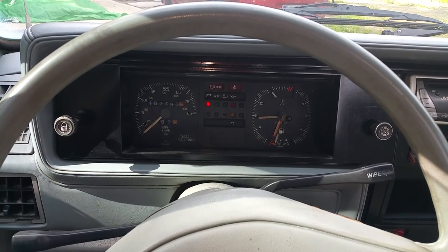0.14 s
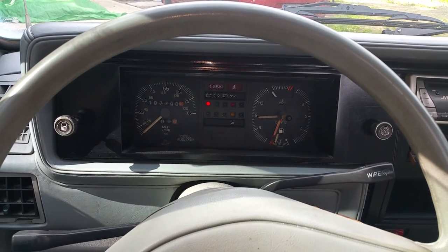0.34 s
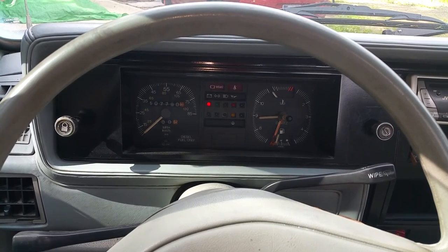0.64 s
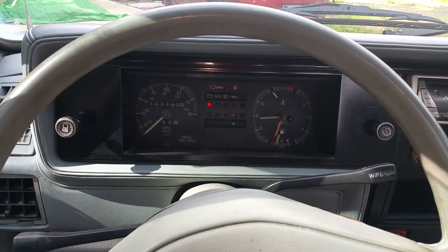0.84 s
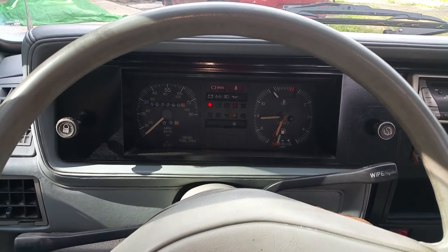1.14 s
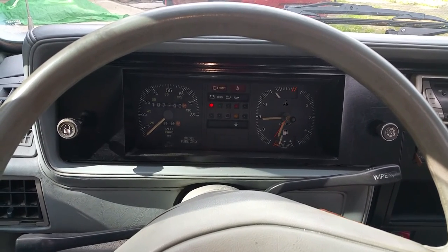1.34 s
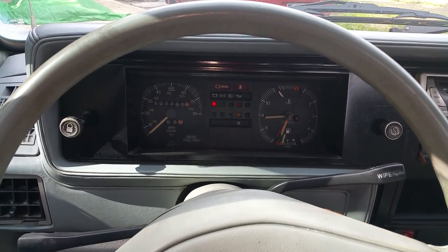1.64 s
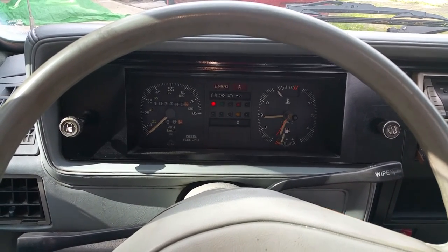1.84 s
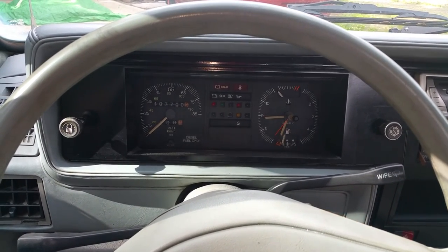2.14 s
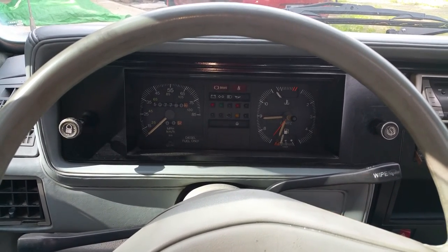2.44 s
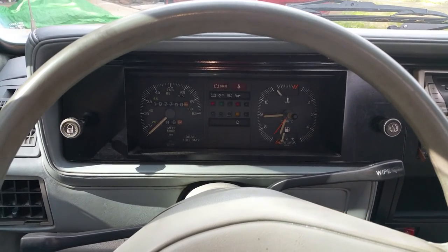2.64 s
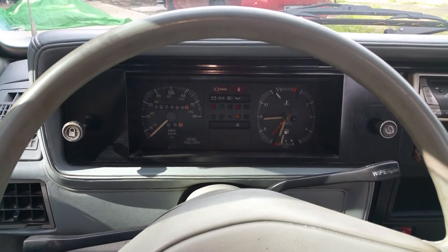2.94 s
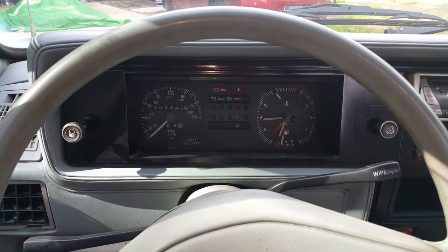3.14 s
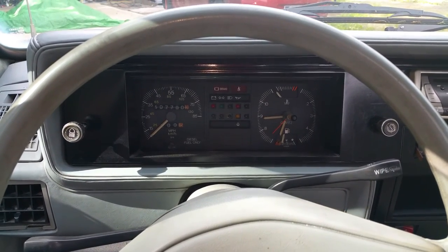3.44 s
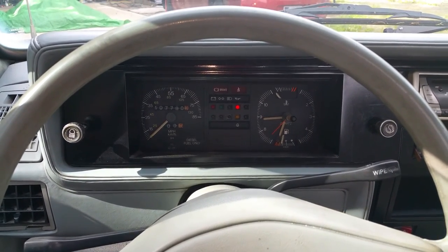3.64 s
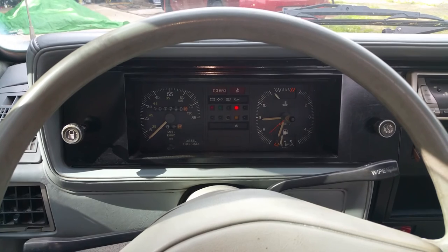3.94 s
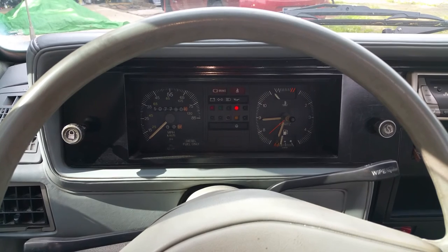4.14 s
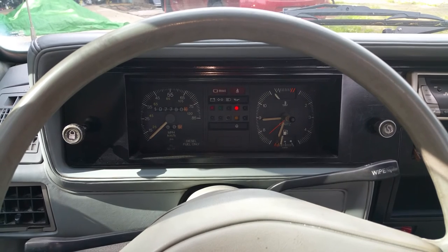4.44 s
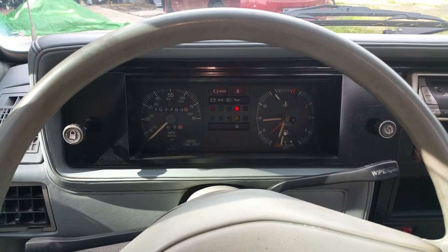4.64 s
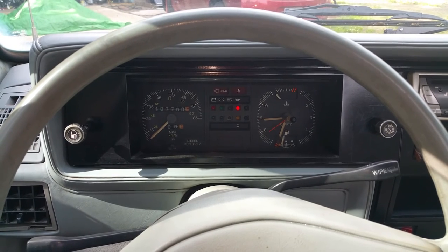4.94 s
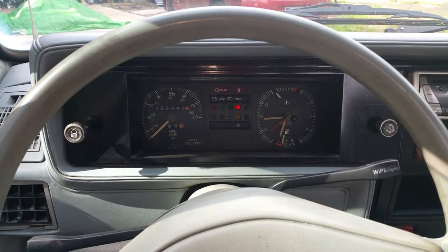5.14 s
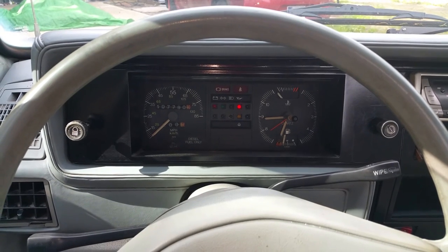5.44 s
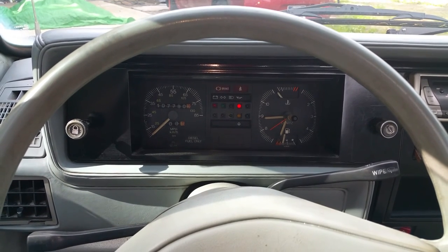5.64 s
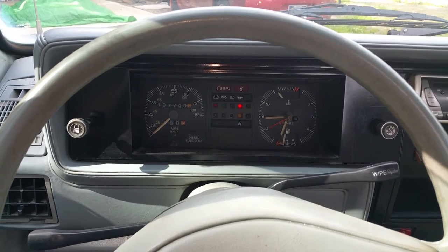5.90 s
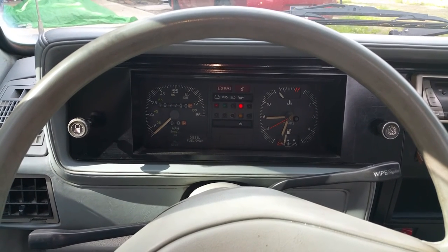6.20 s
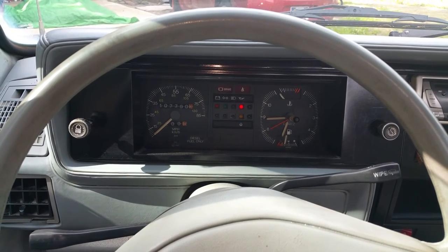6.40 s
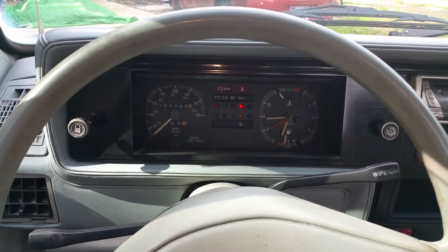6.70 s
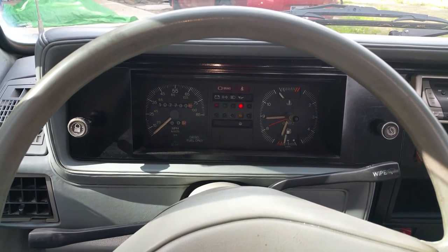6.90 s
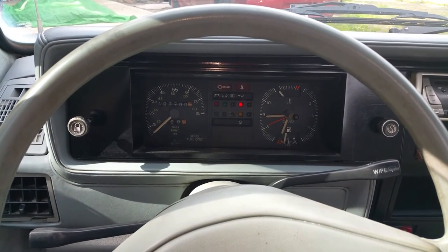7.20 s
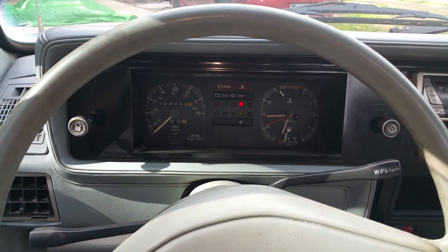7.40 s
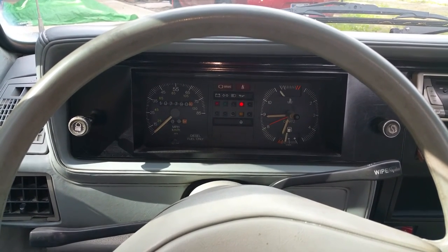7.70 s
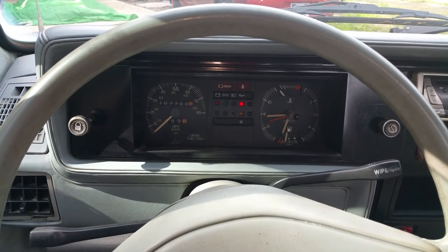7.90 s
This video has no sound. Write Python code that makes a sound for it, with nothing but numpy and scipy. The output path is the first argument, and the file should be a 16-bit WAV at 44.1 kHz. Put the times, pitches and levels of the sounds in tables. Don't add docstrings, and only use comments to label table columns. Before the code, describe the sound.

A quiet parked car interior, heard in stereo at the driver's seat: soft distant rumble, faint hiss, and dash clock ticks near 0.0 and 1.0 s. A small key click at 0.6 s; from 1.25 to 1.4 s, lock clicks, a jingle and dull column clunks. The starter bites at 1.4 s with a brief rough grind and climbing whine. From 1.7 to 2.1 s loud, uneven low thumps and knocks crowd together, with bright key clicks. The diesel runs from 2.1 s, booming and clattering as revs flare to a peak around 2.95 s, a turbine whistle rising behind. At 3.55 s the pedal is released: the boom drops suddenly, and revs and whistle fall. A fast idle holds from about 4.4 to 5.7 s, then sags by 7 s to a slower, looser clattering idle, lifting slightly until 8 s. Occasional fine key tinkles continue until 6.5 s.

```python
import sys
import numpy as np
from scipy import signal
from scipy.fft import rfft, irfft, next_fast_len
from scipy.io import wavfile
from scipy.ndimage import uniform_filter1d

SR = 44100
rng = np.random.default_rng(int(sys.argv[2]) if len(sys.argv) > 2 else 0)


def wav_out(sig):
    wavfile.write(sys.argv[1], SR, np.round(np.clip(np.atleast_2d(sig).T, -1, 1) * 32767).astype(np.int16))


def invert_db(level):
    return 10 ** (np.asarray(level, dtype=float) / 20)


N = 355446

T = np.arange(N) / SR
SHORT_T = np.arange(SR // 4) / SR
BINS_HZ = np.maximum(np.arange(N // 2 + 1) * SR / N, 1)

# t/s, rate f/Hz
CRANKING = [
    (1.4, 11.75),
    (1.68, 14.6),
    (1.72, 36),
    (2.05, 39.9),
]
# t/s, firing rate f/Hz
REVS = [(2.1, 48.9), (2.17, 54.7), (2.25, 62.1), (2.38, 67.77), (2.52, 71.6), (2.66, 73.36), (2.95, 75.1),
        (3.15, 74), (3.38, 71.1), (3.59, 67.5), (4.1, 61.3), (4.45, 59.57), (5.7, 59.08), (6.2, 56.7),
        (7.0, 51.6), (7.25, 51.52), (7.7, 53.2), (8.06, 53.5)]
# t/s, peak level/dB, ring f/Hz, knock level/dB
THUMPS = [(1.447, -25.5, 62.4, -60), (1.499, -34, 74.3, -52), (1.594, -29, 92, -41.5),
          (1.674, -34, 114, -41), (1.713, -16.5, 63, -28.5), (1.741, -11, 86, -24), (1.779, -22, 50.5, -43),
          (1.794, -3, 94, -21), (1.819, -9.5, 70.4, -45), (1.844, -6, 97.4, -19.5), (1.87, -9.5, 64.6, -21),
          (1.899, -6, 90, -24), (1.927, -4, 51, -22), (1.953, -12, 81, -24), (1.984, -5, 78.7, -26.5),
          (2.02, -10, 87.6, -33.5), (2.046, -7.5, 63.5, -28.5), (2.071, -3, 75, -34),
          (2.099, -13.5, 191.5, -28.5), (2.119, -16, 165.4, -31)]
CATCH_S = 1.632
RUNNING_S = REVS[0][0]
FUEL_CUT_S = 3.553
MID_REVS_HZ = 60
TAPPET_HZ = 960


def over_hz(points, size=N):
    hz, value = np.transpose(points)
    lines_hz = np.maximum(np.arange(size // 2 + 1) * SR / size, 1)
    return np.interp(np.log(lines_hz), np.log(hz), value)


def colour(x, points):
    above = np.maximum(np.log2(BINS_HZ / points[-1][0]), 0)
    below = np.maximum(np.log2(points[0][0] / BINS_HZ), 0)
    y = irfft(rfft(x) * invert_db(over_hz(points) - 60 * (above + below)), N)
    return y / np.sqrt(np.mean(y ** 2))


def walk(rate):
    k = int(SR / rate)
    held = np.repeat(rng.standard_normal(N // k + 1), k)
    return 1.3 * uniform_filter1d(uniform_filter1d(held, k), k)[:N]


def ramp(s, length):
    return np.clip((T - s) / length, 0, 1)


def add(out, s, sound):
    i = int(s * SR)
    out[..., i:i + sound.shape[-1]] += sound[..., :N - i]


def burst(hz, spread, t60, channels=1, rise_s=0.00087):
    band_hz = np.clip([hz / spread, hz * spread], 30, .45 * SR)
    sos = signal.butter(3, band_hz, "band", fs=SR, output="sos")
    y = signal.sosfilt(sos, rng.standard_normal((channels, len(SHORT_T))))
    return y / np.std(y) / 2 * (1 - np.exp(-SHORT_T / rise_s)) * 1000. ** (-SHORT_T / t60)


def lift(hz, modes):
    return sum(db / (1 + ((hz - f) / width * 2) ** 2) for f, width, db in modes)


def rings(x, modes, lift_db):
    gain = 1 + sum(invert_db(lift_db) * invert_db(db / 4) / (1 + ((BINS_HZ - hz) / (0.6 * width)) ** 2)
                   for hz, width, db in modes)
    y = irfft(rfft(x) * gain, N)
    return y * np.std(x) / np.std(y)


def still():
    # f/Hz, level/dB per Hz
    still_spectrum = [(34, -26), (58, -1.5), (135, -6.5), (179, -9.5), (232, -12.5), (294, -13.5),
                      (408, -19.5), (609, -19.5), (1120, -22.5), (2380, -27), (4820, -32), (14900, -34.5),
                      (16000, -36.5)]
    # f/Hz, rms level/dB
    far_motor = [(66.5, -74), (97, -78), (134.5, -73)]
    motor = 0
    for hz, db in far_motor:
        level = invert_db(db + 1.5 * walk(5.4))
        turns = np.cumsum(hz * (1 + 0.029 * walk(13.0))) / SR
        motor = motor + np.sqrt(2) * level * np.sin(2 * np.pi * turns)
    return invert_db(-70 + 1.2 * walk(8.5)) * colour(rng.standard_normal(N), still_spectrum) + motor


def clock():
    # t/s, peak level/dB, centre f/Hz
    ticks = [
        (0.029, -54.5, 960),
        (1.035, -51.5, 700),
    ]
    out = np.zeros((2, N))
    for s, db, hz in ticks:
        add(out, s, invert_db(db + 2) * burst(hz, 3.5, 0.077, channels=2, rise_s=0.0027))
        for case_hz, case_db in ((950, -4), (2500, -8), (4250, -8)):
            add(out, s + .005, invert_db(db + case_db) * burst(case_hz, 1.1, .08, channels=2, rise_s=.004))
        add(out, s + 0.014, invert_db(db - 6) * burst(hz, 2.9, 0.093, channels=2))
    return out


def keys():
    # t/s, peak level/dB, centre f/Hz, top-end level/dB
    key_clicks = [(.566, -68, 5500, -92), (1.239, -68, 6000, -81.5), (1.276, -54, 2300, -80),
                  (1.3174, -38, 3620, -56), (1.344, -32, 5000, -51), (1.37, -44, 2720, -56.5),
                  (1.4, -49, 4530, -64), (1.4117, -45, 2900, -63.5), (1.5525, -55, 4000, -63),
                  (1.676, -49.5, 2780, -68.5), (1.8734, -22, 2950, -37), (1.9365, -34, 2680, -52),
                  (1.961, -33.5, 2850, -44.5), (1.982, -33.5, 2730, -51), (2.062, -42.5, 5000, -49.5),
                  (2.069, -38.5, 2550, -49.5), (2.094, -36, 4000, -58.5), (2.1076, -32, 4430, -45.5),
                  (2.15, -56, 4500, -67), (2.19, -50.5, 4500, -65), (2.235, -50.5, 4970, -63.5),
                  (2.267, -54, 3510, -64.5)]
    # t/s, f/Hz, level/dB, t60/s
    jingles = [(1.345, 1750, -43, .04), (1.414, 1750, -41, .05), (1.319, 3800, -48, .04),
               (1.277, 3200, -60, .05), (1.37, 6200, -56, .087), (1.318, 4540, -47, .04),
               (1.872, 11600, -44, .04), (1.94, 14200, -58, .04), (1.958, 7030, -57, .2),
               (1.958, 7080, -45, .04), (1.742, 6250, -66, .12), (1.79, 6500, -63, .03),
               (1.958, 10900, -49, .09), (1.962, 8600, -60, .11), (1.962, 10100, -57, .25),
               (1.955, 12700, -57, .3), (1.99, 11800, -64, .15), (2.108, 14300, -52, .04),
               (1.875, 6300, -45, .04), (1.962, 13950, -56, .22), (2.069, 10600, -49.5, .05)]
    # t/s, peak level/dB
    tinkles = [(2.8817, -67), (3.5737, -69), (3.6904, -71), (3.753, -68.5), (4.1992, -75.5), (4.6684, -58),
               (4.8712, -74), (5.0078, -79), (5.211, -67), (5.2784, -73), (5.346, -69), (5.5509, -65.5),
               (6.098, -61), (6.2382, -56), (6.3106, -66), (6.525, -63)]
    out = np.zeros((2, N))
    t60 = 0.08
    for s, db, hz, top_db in key_clicks:
        body = invert_db(db + 1.5) * burst(hz, 1.88, t60, channels=2)
        top = invert_db(top_db + 6.5) * burst(11800, 1.36, 0.8 * t60, channels=2)
        add(out, s, invert_db([[0.75], [-0.75]]) * (body + top))
    for s, hz, db, ring_t60 in jingles:
        decay = np.minimum(SHORT_T / 0.0019, 1) * 1000. ** (-SHORT_T / ring_t60)
        add(out, s, invert_db(db + np.array([[3.5], [-3.5]])) * np.sin(2 * np.pi * hz * SHORT_T) * decay)
    for s, db in tinkles:
        add(out, s, invert_db(db + 4) * burst(14300, 1.08, .025, channels=2))
    return out


def clunks():
    # t/s, peak level/dB, centre f/Hz, t60/s
    lock_clunks = [(1.25, -53, 60, 0.27), (1.416, -43, 1700, .06), (1.222, -64.5, 336, 0.1),
                   (1.256, -51, 170, 0.2), (1.275, -45.5, 1150, 0.11), (1.307, -46, 1070, 0.2),
                   (1.319, -31, 367, 0.13), (1.344, -30, 1280, 0.15), (1.365, -39, 200, 0.2),
                   (1.382, -37, 203, 0.21), (1.402, -29.5, 227, 0.072), (1.414, -26, 290, 0.12),
                   (1.413, -32.5, 1500, 0.077), (1.443, -23, 310, 0.11)]
    # t/s, peak level/dB, centre f/Hz, t60/s
    lone_knocks = [(1.256, -46, 1110, 0.07), (1.499, -34, 676, 0.051), (1.551, -56, 651, 0.068),
                   (1.586, -43, 773, 0.081), (1.676, -41, 600, 0.08), (2.051, -29, 592, 0.076),
                   (3.568, -31, 634, 0.08), (4.997, -35, 757, 0.093), (7.843, -41, 718.2, 0.11)]
    out = np.zeros(N)
    for s, db, hz, t60 in lock_clunks + lone_knocks:
        add(out, s, invert_db(db + 1.5) * burst(hz, 1.65, t60)[0])
    return out


def flares():
    out = np.zeros(N)
    shake = np.minimum(SHORT_T / 0.007, 1) * 1000. ** (-SHORT_T / 0.12)
    pinion = (1.41, -26)  # t/s, level/dB
    for s, db in [pinion] + [(row[0], row[3]) for row in THUMPS]:
        add(out, s - .007, invert_db(db) * shake)
    return out


def clatter_gains(hz):
    clatter_levels = [
        (-45, -30, -34, 0.47, 4, -13.5),
        (-51, -35.5, -35.5, 0.16, 0.8, -18),
        (-61.5, -44, -42, 0.2873, -3, -11),
    ]
    pulling = 1 - ramp(FUEL_CUT_S, 0.087)
    filled, running = ramp(CATCH_S, 0.43), ramp(RUNNING_S, 0.11)
    shake = flares()
    gains = []
    for crank, catch, run, slope, pull, knock in clatter_levels:
        starting_db = crank + filled * (catch - crank)
        running_db = run + slope * (hz - MID_REVS_HZ) + pull * pulling
        gains.append(invert_db((1 - running) * starting_db + running * running_db) + invert_db(knock) * shake)
    return gains


def cycle_noise(firings, memory, puff, points, size=2048, loose=0., fresh_hz=None):
    cylinders_db = [-0.5, -2.5, -1, -1.5]
    fresh = rng.standard_normal((int(firings[-1] / 4) + 9, size))
    cycles = signal.lfilter([1], [1, -memory], fresh, axis=0)[8:]
    count = int(firings[-1]) + 1
    blows = invert_db(2.9 * rng.standard_normal(count) + np.resize(cylinders_db, count))[firings.astype(int)]
    swell = 1 + blows * puff * np.exp(-(firings % 1))
    at = (firings / 4).astype(int), (firings / 4 % 1 * size).astype(int)
    alike = cycles[at] * np.sqrt(1 - memory ** 2)
    mix = np.sqrt(1 - loose) * alike + np.sqrt(loose) * rng.standard_normal(cycles.shape)[at]
    if fresh_hz:
        low = signal.butter(4, fresh_hz, "low", fs=SR, output="sos")
        high = signal.butter(4, fresh_hz, "high", fs=SR, output="sos")
        hiss = np.sqrt(size * firings[-1] / 4 / N / 4) * rng.standard_normal(N)
        mix = signal.sosfilt(low, mix) + signal.sosfilt(high, hiss)
    return colour(swell * mix, points)


def clatter(firings, gains):
    # f/Hz, level/dB per Hz
    shudder = [(12, -41), (20, -8), (38, -15), (60, -12), (78, -6), (103, -10), (155, -5), (208, -8.5),
               (228, -4), (249, -22), (290, -2.5), (360, -25.5), (420, -23), (550, -59.5), (920, -120)]
    bulkhead = [(220, -17), (380, -5.5), (439, -9), (476, -2.5), (543, -11), (603, -4), (667, -8),
                (724, -4), (771, -9), (841, -16.5), (948, -7), (1060, -17), (1200, -20.5), (1560, -41),
                (2640, -120)]
    injectors = [(650, -36.5), (1100, -3), (1290, -3.5), (1370, -9), (1480, -3.5), (1640, -5.5),
                 (1800, -10.5), (1920, -6.5), (2300, -9), (2610, -7), (2910, -15), (3180, -11),
                 (4330, -24.5), (6080, -26.5), (8000, -35.5), (10400, -69), (17600, -120)]
    # f/Hz, width/Hz, level/dB
    block = [(1630, 430, -4), (1954, 38, -6), (2676, 160, -5.5), (3050, 43, -12), (3260, 24, -10)]
    hz = np.gradient(firings) * SR
    loose = .15 + (.7 - .15) * np.clip((55.5 - hz) / 2, 0, 1)
    shell = gains[0] * invert_db(4 * loose) * cycle_noise(firings, 0.94, 0.96, shudder, size=256, loose=loose)
    wall = cycle_noise(firings, 0.67, 0.61, bulkhead, size=512, loose=0.38 * loose)
    wall = gains[1] * invert_db(0.21 * walk(9)) * wall
    rattle = rings(cycle_noise(firings, 0.46, 0.64, injectors, size=4096, fresh_hz=2300), block, -1.2)
    rattle = gains[2] * invert_db(1.0 * walk(7.6)) * rattle
    dull = signal.sosfilt(signal.butter(2, 1300, fs=SR, output="sos"), rattle)
    rattle = np.where(T < CRANKING[1][0] - .015, 1.4 * dull, rattle)
    trim = [(6000, 1.5), (9000, -1.5), (14500, -2.5), (16000, -4.5)]
    buzz = invert_db(-74.5 + .8 * walk(5.2)) * cycle_noise(firings, .1, .4, trim, size=4096)
    cover = cycle_noise(firings, .3, 0.43, [(3800, 2.5), (4400, -6.0)])
    cover = invert_db(-64) * np.clip((hz - 63) / 8, 0, 1) * cover
    haze = invert_db(-61.5 - 45 * np.maximum(T - 2.12, 0) + 2.5 * walk(40)) * ramp(CATCH_S, 0.33) ** 2
    haze = haze * colour(rng.standard_normal(N), [(3000, -0.5), (5000, -5), (8000, -11.5), (13000, -19.5)])
    start_s = CRANKING[0][0]
    return ramp(start_s, 0.016) * (shell + wall + rattle + cover) + haze + ramp(start_s, .45) * buzz


def starter():
    # t/s, f/Hz, level/dB
    gear_whine = [(1.43, 1300, -64), (1.53, 1350, -63), (1.6, 1650, -56), (1.64, 1500, -63),
                  (1.69, 2000, -54), (1.72, 2000, -70)]
    s, hz, db = np.transpose(gear_whine)
    turns = np.cumsum(np.interp(T, s, hz) * (1 + .02 * walk(40))) / SR
    on = ramp(s[0], .02) * (T < s[-1])
    whine = walk(300) * np.sin(2 * np.pi * turns)
    whine = whine + invert_db(-12) * walk(90) * np.sin(2 * np.pi * 1.64 * turns)
    brushes = colour(rng.standard_normal(N), [(1600, 0), (2800, -3), (4000, -10), (8000, -16)])
    return on * (invert_db(np.interp(T, s, db)) * whine + invert_db(-75) * brushes)


def thumps():
    out = np.zeros(N)
    for s, db, hz, knock_db in THUMPS:
        t60 = 0.05 - 0.02 * db
        push = (1 - np.exp(-SHORT_T / 0.0022)) * 1000. ** (-SHORT_T / t60)
        ring = -np.sin(2 * np.pi * hz * SHORT_T) - 0.38 * np.sin(2 * np.pi * 1.6 * hz * SHORT_T)
        add(out, s, invert_db(db + 1.0) * push * ring)
        knock = invert_db(knock_db) * burst(350, 1.45, 0.12)[0]
        knock += invert_db(knock_db - 18) * burst(1500, 2.6, 0.096, rise_s=.005)[0]
        knock += invert_db(knock_db - 33) * burst(4400, 1.2, 0.22, rise_s=.006)[0]
        add(out, s - .004, knock)
        add(out, s + .003, invert_db(knock_db - 1) * burst(TAPPET_HZ, 1.1, .07)[0])
    return out


def boom(firings, hz):
    order_turns = [(0, 0), (.06, .35), (.7, .21), (.21, .4), (.43, .85)]
    # pulling rms level/dB, slope/dB per Hz of revs, coasting rms level/dB, slope/dB per Hz
    order_levels = [(-26.5, 0.2864, -31, 0), (-34.5, 0.7943, -54.5, 2.5), (-30.5, 0.0755, -42, 0.45),
                    (-37.5, -0.17, -44, 0.14)]
    # f/Hz, width/Hz, level/dB
    cabin_modes = [(61.4, 11.6, 5.5), (71.1, 5.3, 4.5), (113.1, 25.65, 17), (132.9, 9.2, 8.5),
                   (141.6, 6.5, -3), (118, 6.1, -2.5), (155, 7.3, -9), (161, 9.3, 5), (186.2, 39.2, 13.5),
                   (200.3, 5.5, -7), (217, 36, 4), (248, 11, -6), (297.2, 30, 16.5)]
    throb = [.02, .04, .04, .1, .1]
    quarters = [2, 5, 6, 9, 15]
    quarters_db = [-46.5, -46, -47, -43.5, -42.5]
    panel_quarters = [19, 21, 22]
    panel_quarters_db = [-6.5, -8.5, -6.5]

    def panel(order):
        return -36.5 - 20 * np.log10(1 + ((order * hz - 301) / 38 * 2) ** 2)

    lifted = ramp(FUEL_CUT_S - .006, .012)
    span = np.arange(0, 400, .5)
    cabin = lift(span, cabin_modes)
    above_mid = hz - MID_REVS_HZ
    levels = []
    for k, (pull, rise, coast, sag) in enumerate(order_levels):
        pedal_db = (1 - lifted) * (pull + rise * above_mid) + lifted * (coast + sag * above_mid)
        levels.append(pedal_db + np.interp((k + 1) * hz, span, cabin))
    levels[2] = levels[2] - 6.5 * ramp(6.73, .04)
    levels.append(panel(len(order_turns)))

    rocking = 0
    for quarter, db in zip(quarters, quarters_db):
        rocking = rocking + invert_db(db + 1.8 * walk(6.8)) * np.sin(np.pi / 2 * quarter * firings + quarter)
    for quarter, db in zip(panel_quarters, panel_quarters_db):
        song = invert_db(panel(quarter / 4) + db + 1.3 * walk(6.9))
        rocking = rocking + song * np.sin(np.pi / 2 * quarter * firings)

    orders = 0
    for k, (db, (pulling, coasting)) in enumerate(zip(levels, order_turns)):
        swell = 1 + throb[k] * np.cos(np.pi / 2 * firings)
        turns = (k + 1) * firings - pulling - lifted * (coasting - pulling)
        orders = orders + np.sqrt(2) * invert_db(db + 0.55 * walk(18)) * swell * np.cos(2 * np.pi * turns)

    belt = invert_db(-43.5) * np.clip((hz - 66) / 6, 0, 1) * (1 - lifted) * np.sin(2 * np.pi * 4.75 * firings)
    hum = invert_db(-61 + lift(8.25 * hz, [(488, 30, 14)])) * lifted * np.sin(2 * np.pi * 8.25 * firings)
    return belt + hum + ramp(RUNNING_S, .029) * (rocking + orders)


def tappet(firings, hz):
    cycle = np.floor((firings - firings[int(2.766 * SR)]) / 4)
    cycle = (cycle - cycle[0]).astype(int)
    strikes = np.r_[0, np.diff(cycle)] * invert_db(2.0 * rng.standard_normal(cycle[-1] + 1))[cycle]
    t = np.arange(SR // 20) / SR
    tones = np.sin(2 * np.pi * TAPPET_HZ * t) + .6 * np.sin(1.9 * np.pi * TAPPET_HZ * t)
    ring = np.minimum(t / .007, 1) * 1000. ** (-t / .075) * tones
    level = invert_db(-25.5 + .35 * (hz - 75) - 11 * ramp(3.05, .15))
    return level * (T > RUNNING_S) * signal.fftconvolve(strikes, ring)[:N]


def turbine():
    # t/s, whistle f/Hz, boost level/dB
    whistle_path = [(2.35, 1120, -3), (2.45, 1290, 7), (2.53, 1440, 2), (2.63, 1630, 5), (2.72, 1850, -8),
                    (2.78, 1975, 2), (2.93, 2200, 2), (3.02, 2330, -3), (3.15, 2470, -1.5), (3.5, 2530, 0),
                    (3.87, 2280, -10), (3.93, 2210, 2), (4.08, 2065, 1), (4.22, 1990, 0), (4.3, 1910, -2),
                    (4.42, 1820, 2), (4.6, 1720, -8), (5.0, 1625, -.5), (5.7, 1598, -1), (6.1, 1540, -2),
                    (6.36, 1455, -1), (6.6, 1330, 0), (7.0, 1190, 0)]
    # f/Hz, width/Hz, level/dB
    duct = [(1500, 400, 8), (1800, 120, -7), (2048, 330, 13)]
    s, hz, db = np.transpose(whistle_path)
    path_hz = np.interp(T, s, hz)
    turns = np.cumsum(path_hz * (1 + .008 * walk(70))) / SR
    flutter = 1 + .2 * walk(25) + .35 * walk(150)
    on = np.clip(np.minimum(T - s[0], s[-1] - T) / .1, 0, 1)
    level = invert_db(-58 + np.interp(T, s, db) + lift(path_hz, duct))
    return on * level * flutter * np.sin(2 * np.pi * turns)


def ports(shared, apart):
    # f/Hz, share heard by both ports
    likeness = [(60, 0.79), (290, 0.91), (640, 0.57), (1400, 0.35), (3000, 0.049), (7000, 0.044),
                (15000, .15)]
    # f/Hz, left minus right level/dB
    lean_db = [(60, 6.0), (110, 5.5), (200, 8.5), (380, 3.5), (700, 3.5), (1290, 4.5), (2380, 9.5),
               (4400, -0.5), (8120, -1.5), (15000, 9)]
    tail = np.linspace(1, 0, SR // 2) ** 2
    size = 2 * next_fast_len((N + SR) // 2)
    alike = np.clip(over_hz(likeness, size=size), 0, 1)
    lean = over_hz(lean_db, size=size) / 2
    mid, side = (rfft(np.r_[x, x[:-len(tail) - 1:-1] * tail], size) for x in (shared, apart))
    mid, side = mid * np.sqrt((1 + alike) / 2), side * np.sqrt((1 - alike) / 2)
    even = 2 / (invert_db(lean) + invert_db(-lean))
    hz = np.arange(len(mid)) * SR / size
    lag_s = 16 / SR * np.clip(hz / 1300, .35, 1)
    left = (mid + side) * invert_db(lean) * even * np.exp(-2j * np.pi * hz * lag_s)
    right = (mid - side) * invert_db(-lean) * even
    return np.array([irfft(left, size), irfft(right, size)])[:, :N]


def scene():
    hz = np.interp(T, *np.transpose(CRANKING + REVS))
    gains = clatter_gains(hz)
    firings = np.cumsum(hz) / SR
    low = boom(firings, hz) + thumps() + clunks()
    whistle = turbine() + starter() + tappet(firings, hz)
    shared = low + whistle + clatter(firings, gains) + still()
    apart = whistle + clatter(firings, gains) + still()
    return invert_db(0.5) * ports(shared, apart) + keys() + clock()


def band_limit(x):
    return signal.sosfilt(signal.butter(12, 15830, fs=SR, output="sos"), x)


def record(dry):
    close = np.minimum((N - np.arange(N)) / 256, 1)
    return band_limit(close * np.tanh(0.55 * dry) / 0.5)


dry = scene()
out = record(dry)
wav_out(out)
```